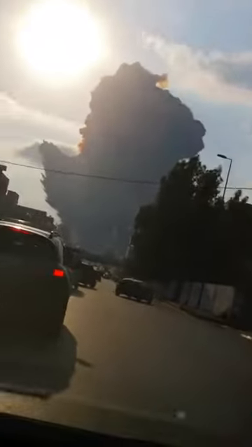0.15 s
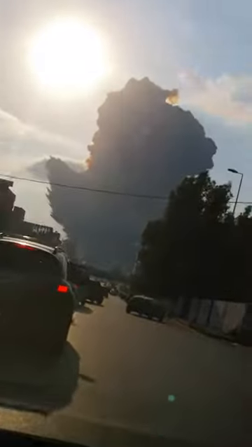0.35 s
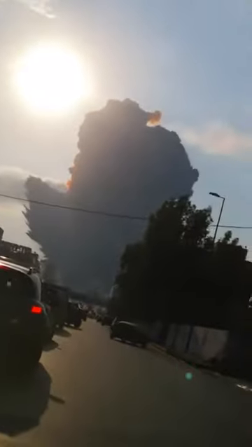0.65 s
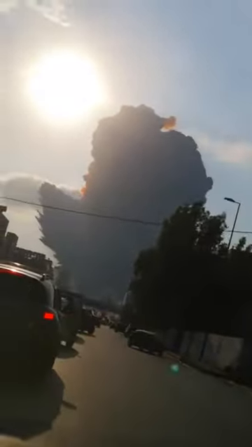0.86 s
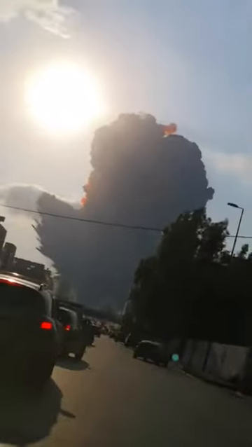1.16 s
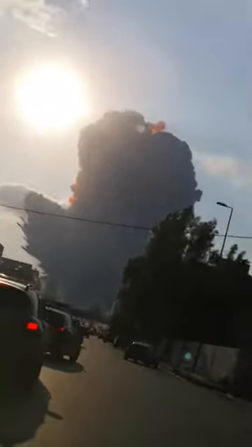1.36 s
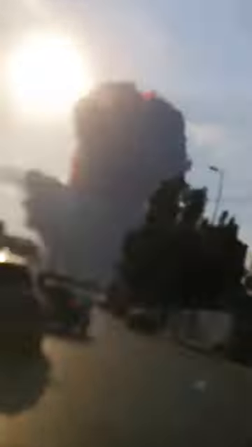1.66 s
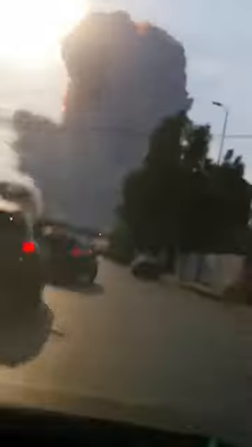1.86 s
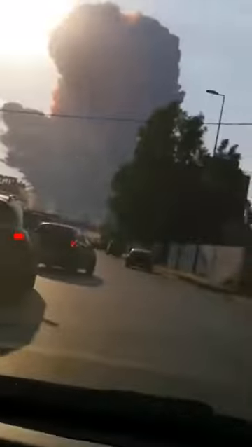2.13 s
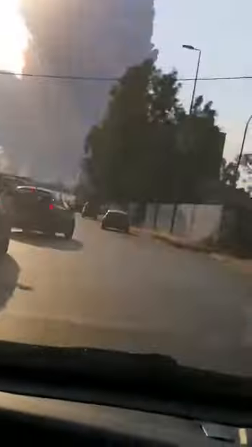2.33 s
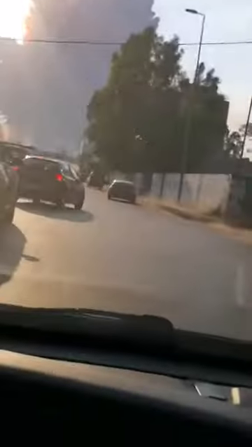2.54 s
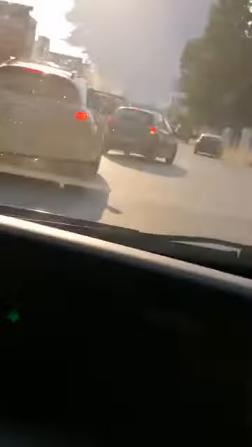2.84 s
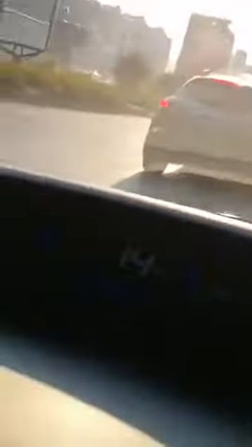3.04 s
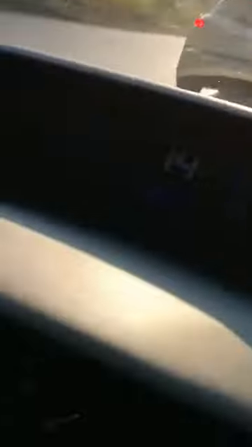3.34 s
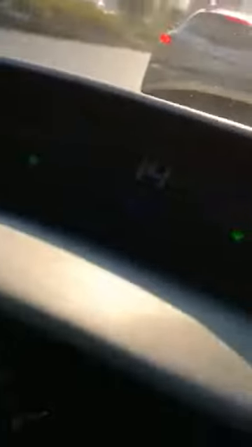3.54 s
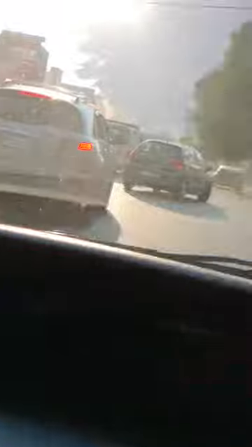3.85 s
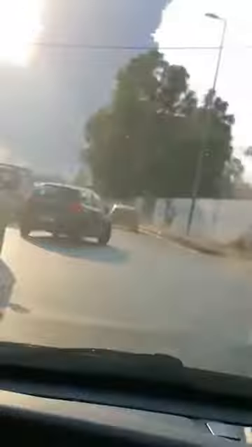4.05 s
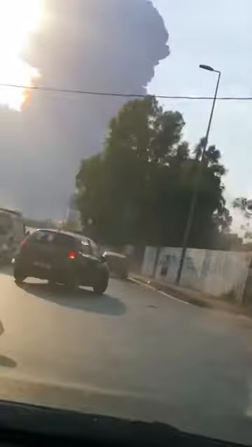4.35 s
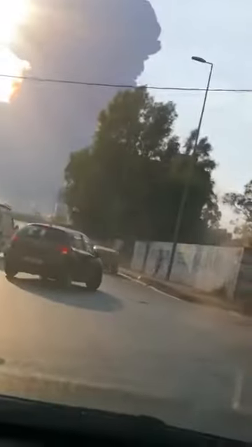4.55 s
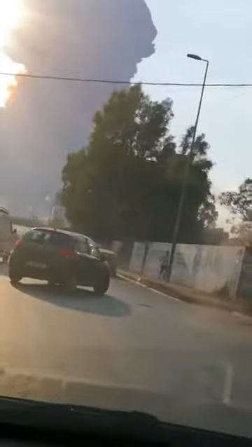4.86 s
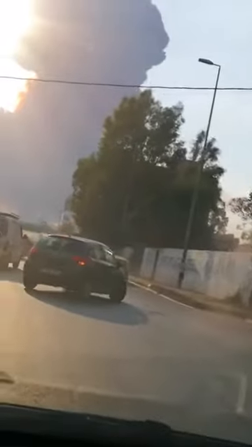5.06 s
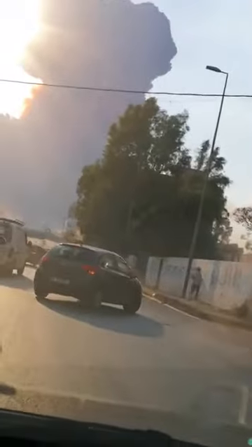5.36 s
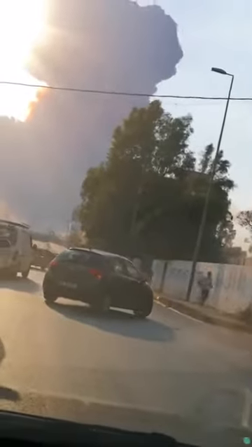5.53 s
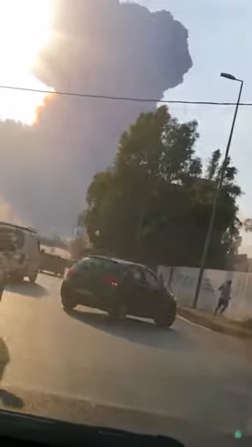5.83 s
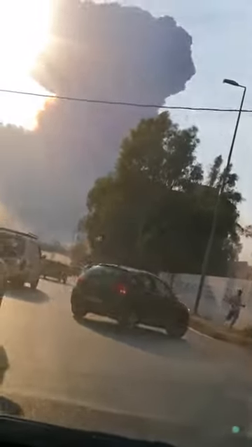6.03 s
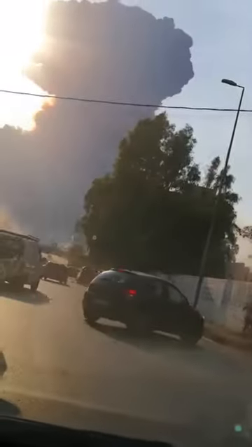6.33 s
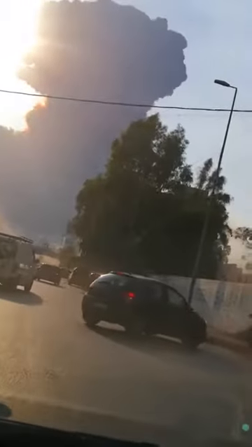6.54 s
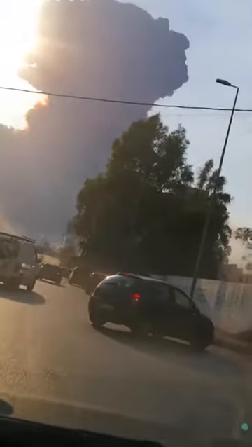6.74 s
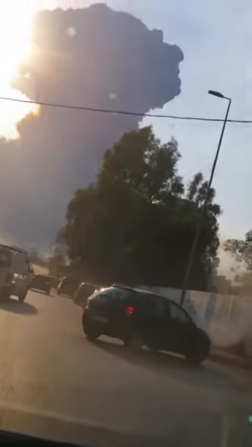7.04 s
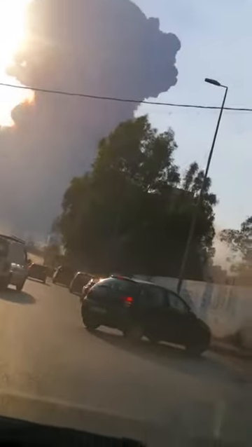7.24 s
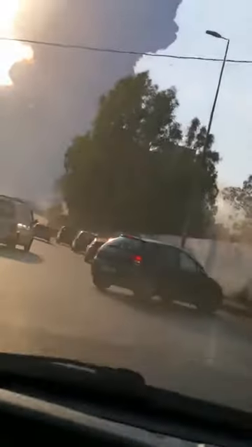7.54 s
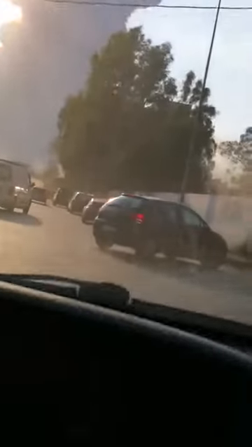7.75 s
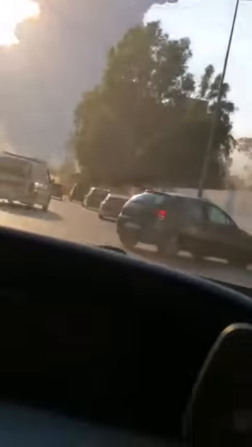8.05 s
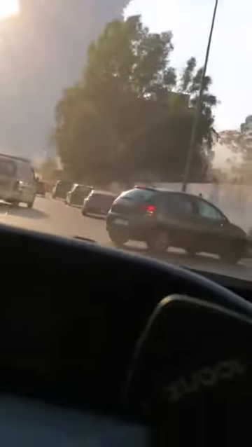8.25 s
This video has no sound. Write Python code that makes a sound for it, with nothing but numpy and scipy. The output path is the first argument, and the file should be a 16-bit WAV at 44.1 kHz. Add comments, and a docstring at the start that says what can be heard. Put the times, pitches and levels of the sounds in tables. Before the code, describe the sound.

Low road noise and gusty wind thumps, a sudden massive explosion, long heavy rumbling echoes, clattering falling fragments, then a distant car alarm as it fades.

```python
"""Distant blast, heard in a car

Inside a slow car with open windows, wind buffets the microphone ports as shaped noise and short low swings.
The shock wave of a huge distant explosion hits: an N-shaped pulse and dying sines make the cabin boom.
Echoes roll in as low noise bands, debris and glass rain down outside as filtered noise and ringing grains,
and a far car alarm warbles: a sine sweeping up and down, smeared by echoes."""
import sys
import numpy as np
from scipy import signal
from scipy.fft import rfft, irfft, next_fast_len
from scipy.io import wavfile
from scipy.ndimage import uniform_filter1d

SR = 44100
rng = np.random.default_rng(int(sys.argv[2]) if len(sys.argv) > 2 else 0)


def int16_out(signal):
    """Quantize to a 16-bit WAV file."""
    q = np.round(np.clip(np.atleast_2d(signal).T, -1, 1) * 32767)
    wavfile.write(sys.argv[1], SR, q.astype(np.int16))


N = 369999   # samples
LEFT_RIGHT = np.array([[1], [-1]])


def from_db(db):
    """Gain of a dB value."""
    return 10 ** (np.asarray(db) / 20)


def rms_one(x):
    """Scaled to rms 1."""
    return x / np.sqrt(np.mean(x ** 2) + 1e-20)


def in_time(rows):
    """Columns as curves; the first one falls silent just outside the table."""
    s, first, *rest = np.transpose(rows)
    t = np.arange(N) / SR
    return [np.interp(t, s, first, -150, -150)] + [np.interp(t, s, column) for column in rest]


def at_hz(points, hz):
    """A frequency table read on a log axis."""
    table_hz, values = np.array(points).T
    return np.interp(np.log(hz), np.log(table_hz), values)


def drift(rate):
    """Slow random wander of spread 1: noise through two equal low-pass poles at the rate in Hz."""
    step = 40   # samples between computed points
    r = np.exp(-2 * np.pi * rate * step / SR)
    noise = rng.standard_normal(N // step + 2002)
    slow = signal.lfilter([1], [1, -2 * r, r * r], noise)[2000:]   # skips the filter's start
    return np.interp(np.arange(N) / step, np.arange(len(slow)), rms_one(slow))


def lumpy(depth_db, rate):
    """Two white noises that swell and sink together."""
    return rng.standard_normal((2, N)) * from_db(depth_db * drift(rate))


# tilt between the ports: (frequency [Hz], left minus right [dB])
PORT_BALANCE = [(60, 0), (310, -.2), (530, 2.5), (900, .5), (1550, -6.5), (2670, -8.5), (4600, -5),
                (7900, -1.5)]


def coloured(pair, spectrum, likeness, lead=((0, 0), (1, 0))):
    """Two unrelated signals filtered to a spectrum and mixed to the likeness, balance and lead of the ports; rms 1."""
    size = next_fast_len(N)
    hz = np.maximum(np.arange(size // 2 + 1) * SR / size, 1)
    inside = (hz >= spectrum[0][0]) & (hz <= spectrum[-1][0])
    mid, side = rfft(pair, size) * from_db(at_hz(spectrum, hz)) * inside
    alike = np.clip(at_hz(likeness, hz), -1, 1)
    ports = np.sqrt(1 + alike) * mid + np.sqrt(1 - alike) * side * LEFT_RIGHT
    ports = ports * np.exp(.5j * np.interp(hz, *np.transpose(lead)) * LEFT_RIGHT)
    balance = from_db(at_hz(PORT_BALANCE, hz) / 2 * LEFT_RIGHT)
    return rms_one(irfft(ports * balance, size)[:, :N])


def evened(x, share):
    """Takes a share of the random swells out of a narrow noise, so that it swings on like a driven resonance."""
    size = next_fast_len(N)
    swell = np.abs(signal.hilbert(x.mean(axis=0), size)[:N])
    return rms_one(x / (swell + 0.25) ** share)


def add(out, s, sound):
    """Mixes a sound in at a time."""
    at = round(s * SR)
    out[..., at:at + sound.shape[-1]] += sound[..., :N - at]


# colour of the street bed: (frequency [Hz], relative density [dB])
STREET_COLOUR = [(410, -35.5), (700, -7.5), (870, -8.5), (955, -5), (1150, -7), (1500, -8.5), (2030, -5.5),
                 (2700, -13.5), (3500, -17.5), (4500, -20.5), (6470, -25), (7960, -22), (8300, -53),
                 (10800, -67.5), (18300, -120)]
# how alike the ports are for the wind and the street bed: (frequency [Hz], left-right correlation [-1 to 1])
WIND_LIKENESS = [(60, 0.94), (120, 0.76), (240, 0.1), (490, -0.56), (980, -0.16), (1960, -0.073),
                 (3940, -0.15), (7910, -0.25)]
STREET_DB = -52.5   # rms


def street():
    """A steady bed of coloured noise that swells gently."""
    return from_db(STREET_DB) * coloured(lumpy(depth_db=.8, rate=6), STREET_COLOUR, WIND_LIKENESS)


# faint steady tones in the cabin: (frequency [Hz], typical rms level [dB])
HUM_TONES = [(937, -68), (1390, -73), (1970, -71)]


def hum():
    """Steady thin tones that waver a little in pitch and level."""
    out = 0
    for hz, level_db in HUM_TONES:
        gain = np.sqrt(2) * from_db(level_db + 2 * drift(3))
        phase = 2 * np.pi * np.cumsum(hz + 3 * drift(8)) / SR
        out = out + gain * np.sin(phase)
    return out


# gusts on the microphone ports, one list per spell of wind: (time [s], level [dB])
GUSTS = [
    [(0.0, -38), (0.06, -14), (0.2, -22), (0.382, -22), (.45, -25), (.54, -31), (0.6, -24), (.67, -19.5),
     (.75, -20), (.78, -20.5), (0.834, -12), (.92, -21), (.97, -32.5), (1.078, -30), (1.346, -31.5),
     (1.53, -33.5)],
    [(8.12, -48), (8.26, -28.5), (8.39, -22)],
]
# colour of the low wind body: (frequency [Hz], relative density [dB])
WIND_COLOUR = [(25, -27), (60, -9.5), (120, 1), (220, -4), (330, -12), (450, -24), (600, -36)]
# colour of the rougher edge on the wind: (frequency [Hz], relative density [dB])
WIND_EDGE_COLOUR = [(250, -46), (350, 1.5), (500, -4), (1000, -27.5), (1800, -59.5)]
# sharp puffs on the ports: (time [s], level [dB], rasp beside the low swing, before a common lift [dB])
PUFFS = [(0.046, -14, -25), (0.059, -21, -21), (0.075, -14, -30), (0.108, -11, -24), (0.174, -5, -31),
         (0.208, -8.5, -17.5), (0.223, -18, -26), (.266, -23, -20.5), (0.35, -19, -34), (0.402, -11, -38),
         (0.445, -27, -18), (0.505, -29, -13), (0.589, -12, -31), (0.648, -4.5, -35), (0.704, -3.5, -27),
         (0.715, -23, -18), (0.746, -15, -36), (0.789, -14, -26), (0.813, -6, -30), (0.838, -10.5, -27),
         (0.859, -16, -27), (0.887, -7, -31), (1.092, -11.5, -38), (1.213, -16, -33), (1.36, -15, -33),
         (1.409, -13, -39), (8.212, -25, -13), (8.275, -18, -15.5), (8.295, -29, -12), (8.319, -19.5, -8.5),
         (8.375, -28, -7)]
WIND_EDGE_DB = -19.5   # edge beside the body
PUFF_T60_S, PUFF_RISE_S, RASP_LIFT_DB = .06, .0025, 6


def wind():
    """Turbulence at each port: lumpy low noise with a rougher edge, and single puffs that swell in a few ms."""
    out = np.zeros((2, N))
    body = coloured(lumpy(depth_db=5.5, rate=72), WIND_COLOUR, WIND_LIKENESS)
    edge = coloured(lumpy(depth_db=3.0, rate=40), WIND_EDGE_COLOUR, WIND_LIKENESS)
    for gust in GUSTS:
        level_db, = in_time(gust)
        out = out + from_db(level_db) * (body + from_db(WIND_EDGE_DB) * edge)
    t = np.arange(SR // 8) / SR
    rasp_band = signal.butter(2, [250, 750], "band", fs=SR, output="sos")
    for s, level_db, rasp_db in PUFFS:
        swing_hz, phases = rng.uniform(69, 207), rng.uniform(0, 1.0, (2, 1))
        push = np.sin(2 * np.pi * swing_hz * t + phases)
        rasp = rms_one(signal.sosfilt(rasp_band, rng.standard_normal((2, len(t)))))
        rasp = rasp * from_db(rasp_db + RASP_LIFT_DB)
        envelope = from_db(level_db - 60 * t / PUFF_T60_S) * np.minimum(t / PUFF_RISE_S, 1)
        add(out, s, envelope * (push + rasp))
    return out * from_db(-.6 * LEFT_RIGHT)   # the right port catches slightly more


# how the far siren comes and goes: (time [s], level [dB])
ALARM = [(4.8, -62), (5.25, -52), (5.5, -58), (6.07, -49), (6.4, -52), (6.7, -46.5), (6.85, -50),
         (7.0, -48), (7.35, -44.5), (7.55, -46), (7.67, -46.5), (7.92, -44), (8.1, -49), (8.39, -55)]
# peaky response of the horn: (frequency [Hz], gain [dB])
HORN = [(1450, -30), (1780, -18), (1900, -3), (2020, -15), (2400, -11), (2620, 4), (2800, -2), (3200, -4),
        (3450, -8)]
# the sweep: a moment at its top, the time for one turn up and down, and its ends
ALARM_TOP_S, ALARM_PERIOD_S, ALARM_TOP_HZ, ALARM_LOW_HZ = 7.238, .1395, 3420, 1450
WALL_ECHO_S, WALL_ECHO_DB = .068, -11   # one strong echo of the siren
NEAR_ECHO_T60_S, NEAR_ECHO_DB = .06, -1   # cars close by scatter the siren
STREET_ECHO_T60_S, STREET_ECHO_DB = .6, 1


def alarm():
    """A siren sweeps in a triangle through a peaky horn; near and far echoes smear the sweep."""
    turns = (np.arange(N) / SR - ALARM_TOP_S) / ALARM_PERIOD_S
    from_top = 2 * np.abs(turns - np.round(turns))   # 0 at the top of the sweep, 1 at the bottom
    hz = ALARM_TOP_HZ - (ALARM_TOP_HZ - ALARM_LOW_HZ) * from_top
    level_db = in_time(ALARM)[0] + at_hz(HORN, hz) + .7 * drift(5) + 3 * drift(80)
    siren = from_db(level_db) * np.sin(2 * np.pi * np.cumsum(hz) / SR)
    late = round(WALL_ECHO_S * SR)
    delayed = np.r_[np.zeros(late), siren[:-late]]
    siren = siren + from_db(WALL_ECHO_DB + 3 * drift(2)) * delayed
    t, paths = np.arange(SR) / SR, 0
    for t60, echo_db in ((NEAR_ECHO_T60_S, NEAR_ECHO_DB), (STREET_ECHO_T60_S, STREET_ECHO_DB)):
        sparse = rng.standard_normal((2, SR)) * (rng.random((2, SR)) < .05)
        echoes = sparse * from_db(-60 * t / t60)
        paths = paths + from_db(echo_db) * echoes / np.sqrt(np.sum(echoes ** 2, axis=1, keepdims=True))
    return siren + signal.fftconvolve(siren[None], paths, axes=1)[:, :N]


# thin squeals, perhaps brakes: (time of the peak [s], frequency there [Hz], glide [Hz/s],
# rms level at the peak [dB], rise [dB/s], fall [dB/s])
SQUEALS = [(7.96, 2255, -1500, -36.5, 280, 230), (.95, 7760, -200, -58, 350, 200)]


def squeals():
    """Short gliding sines that swell and fade around a peak."""
    out = 0
    for s, hz, glide, peak_db, rise, fall in SQUEALS:
        t = np.arange(N) / SR - s
        level_db = peak_db + np.where(t < 0, rise * t, -fall * t)
        phase = 2 * np.pi * (hz * t + glide * t ** 2 / 2)
        out = out + np.sqrt(2) * from_db(level_db) * np.sin(phase)
    return out


# surges that shake the panels: (time [s], clatter [dB], dull rattle [dB], glassy top [dB], hold [s])
SURGES = [(1.533, -23, -27, -32, 0.0074), (1.55, -26, -19, -57, 0.032), (1.595, -36, -29, -64, 0.017),
          (1.683, -37, -35, -52, .01), (1.727, -33.5, -30, -61, 0.0075), (1.765, -37, -24, -73, 0.023),
          (1.8, -42, -33, -64, 0.018), (1.91, -61, -43, -68, 0.013), (2.06, -57, -60, -70, 0.0061),
          (2.18, -65, -52, -69, 0.01), (2.45, -49, -51, -52, 0.1)]
# density of the falling debris: (time [s], clatter level [dB], glass beside the clatter [dB])
SHOWER = [(3.1, -58, 2.5), (3.33, -44, -1), (3.39, -30.5, -14), (3.5, -27, -8), (3.65, -26, -8),
          (3.84, -27, -8.5), (3.9, -29.5, -5), (4.05, -26.5, -8), (4.27, -34, -7.5), (4.7, -35, -5),
          (5.43, -38.5, -7.5), (5.47, -46.5, 3), (5.56, -43, -17), (5.6, -38, -7), (5.9, -40, -6.5),
          (6.2, -40.5, -12), (6.76, -44, -11.5), (7.06, -49.5, -19), (7.84, -49, -21), (8.39, -53, -8)]
# starting level of the panel buzz: clatter [dB], rattle [dB], top [dB]
BUZZ_DB = (-39, -38.5, -45)
BUZZ_FADE_DB_PER_S, BUZZ_PATCHY_DB = 3, 1   # panels buzz on while the echoes roll
SURGE_RISE_S, SURGE_T60_S = 0.0019, 0.098
SHOWER_RATTLE_DB = -11.5   # beside the clatter


def debris_levels():
    """Clatter, rattle and top: surges on the panels, their patchy fading buzz and the shower of debris add up."""
    t = np.arange(N) / SR
    shower_db, glass_db = in_time(SHOWER)
    gains = from_db([shower_db, shower_db + SHOWER_RATTLE_DB, shower_db + glass_db])
    fade_db = BUZZ_FADE_DB_PER_S * (t - SHOCK[0])
    gains = gains + from_db(np.c_[list(BUZZ_DB)] - fade_db + BUZZ_PATCHY_DB * drift(16))
    for k, (s, *levels_db, hold_s) in enumerate(SURGES):
        rise = np.clip((t - s) / SURGE_RISE_S + (k == 0), 0, 1)   # the first one comes at once with the shock
        dying_s = np.maximum(t - s - SURGE_RISE_S - hold_s, 0)
        gains = gains + rise * from_db(np.c_[levels_db] - 60 * dying_s / SURGE_T60_S)
    return (t > SHOCK[0]) * gains


# colour of the clatter: (frequency [Hz], relative density [dB])
CLATTER_COLOUR = [(1000, -17), (1350, -5), (1800, 0.5), (2100, 2), (2400, 1), (2750, -0.5), (3300, -7.5),
                  (3900, -14), (4600, -42.5)]
# colour of the dull rattle: (frequency [Hz], relative density [dB])
RATTLE_COLOUR = [(600, -7), (780, 0), (870, -1.5), (1050, -4.5), (1320, -7), (1500, -17), (1800, -15.5)]
# colour of the glassy top: (frequency [Hz], relative density [dB])
GLASS_COLOUR = [(3300, -8), (4200, -4), (5500, -6), (6400, -10), (7200, -3), (8200, -16.5), (11000, -12),
                (15500, -25.5)]
# how alike the ports are for the debris and the echoes: (frequency [Hz], left-right correlation [-1 to 1])
FAR_LIKENESS = [(60, 1), (125, 1), (250, 0.99), (500, 0.46), (1000, 0.45), (2000, 0.053), (4000, 0.054),
                (8000, 0.049)]
# how far the left port leads for the debris and the echoes: (frequency [Hz], phase [radians])
FAR_LEAD = [(0, 0), (40, -.04), (85, -.2), (170, -.55), (260, -0.7), (520, 2.5), (860, 1.5), (1290, -0.2),
            (1640, -0.3), (1980, -1), (2500, -6), (3010, -7.5), (3360, -10), (4310, 0.5), (6200, 1.5),
            (6550, 1.5), (8100, 1)]


def debris(per_s=1500, spread_db=3, grain_db=-5, cycles=90):
    """A dense smooth rush of falling pieces, with nearer pieces ringing briefly at pitches of their own."""
    struck = rng.random((2, N)) < per_s / SR
    sizes = from_db(spread_db * np.minimum(rng.exponential(1, (2, N)), 4)) * struck
    pitches, dealt, grains = np.geomspace(800, 8000, 36), rng.integers(0, 36, N), 0
    for k, hz in enumerate(pitches):
        r = from_db(-60 * hz / (cycles * SR))   # each grain falls 60 dB in this many cycles
        w = 2 * np.pi * hz / SR
        strikes = sizes * (dealt == k) + 1e-18
        ringing = signal.lfilter([0, np.sin(w)], [1, -2 * r * np.cos(w), r * r], strikes)
        grains = grains + hz * ringing   # higher pitches ring stronger
    shower = rms_one(lumpy(depth_db=0.84, rate=21)) + from_db(grain_db) * rms_one(grains)
    clatter_gain, rattle_gain, glass_gain = debris_levels()
    clatter = clatter_gain * coloured(shower, CLATTER_COLOUR, FAR_LIKENESS, FAR_LEAD)
    rattle = rattle_gain * coloured(shower, RATTLE_COLOUR, FAR_LIKENESS, FAR_LEAD)
    glass = glass_gain * coloured(shower, GLASS_COLOUR, FAR_LIKENESS, FAR_LEAD)
    return clatter + rattle + glass


SNAP_DB, SNAP_T60_S = 6, .008   # first contact of a hit, above its burst


def hits(table, t60, burst_db, low_hz, top_hz, rough, rise_s):
    """Each hit: a short rough ring on its pitch over a snap and a burst of noise, mostly shared by the ports."""
    out, t = np.zeros((2, N)), np.arange(SR // 5) / SR
    burst_band = signal.butter(3, [low_hz, top_hz], "band", fs=SR, output="sos")
    decay = from_db(-60 * t / t60) * np.minimum(t / rise_s, 1)
    snap = 1 + from_db(SNAP_DB - 60 * t / SNAP_T60_S)
    for s, level_db, hz, pan_db in table:
        noise = rng.standard_normal((2, 2, len(t)))   # (ring or burst, port, sample)
        noise = .75 * noise + .45 * noise.sum(axis=1, keepdims=True)
        band = signal.butter(1, [hz / (1 + rough), hz * (1 + rough)], "band", fs=SR, output="sos")
        tone = rms_one(signal.sosfilt(band, noise[0]))
        burst = from_db(burst_db) * snap * signal.sosfilt(burst_band, noise[1])
        add(out, s, (tone + burst) * decay * from_db(level_db + pan_db / 2 * LEFT_RIGHT))
    return out


# ticks of trim, grit and glass: (time [s], ring level before its decay [dB], pitch [Hz], left minus right [dB])
TICKS = [(0.631, -49, 3770, -6), (0.713, -36, 7800, -7), (0.7885, -33.5, 5760, -2), (0.8606, -36, 7700, -6),
         (1.1478, -42.5, 5930, -3), (1.507, -34, 5200, -11), (1.537, -22.5, 3520, 14),
         (1.683, -33, 3840, 11), (1.803, -41, 3900, 5), (1.935, -39, 3900, 9), (2.456, -38, 4930, 9),
         (2.748, -48, 7240, 2), (2.913, -44, 7260, 12), (3.1005, -36, 3680, 2), (3.2742, -20, 4000, 5.5),
         (4.3936, -28, 4560, 1), (5.0499, -36, 7210, 2), (6.3994, -45, 5540, 3), (7.0684, -40, 6000, -2),
         (7.429, -47, 6100, -1), (7.7897, -38, 5130, -2), (8.1509, -52, 5500, 7), (8.203, -43, 6560, -3),
         (8.185, -43.5, 5950, 7), (8.2194, -50, 6000, -3)]


def ticks():
    """Small hard pieces: bright, quick hits with a narrow ring."""
    return hits(TICKS, t60=.044, burst_db=-9, low_hz=2500, top_hz=9500, rough=.035, rise_s=.0003)


# larger pieces landing: (time [s], ring level before its decay [dB], pitch [Hz], left minus right [dB])
CLACKS = [(.631, -49.5, 2000, 8), (1.557, -19, 1450, -9), (1.572, -25, 1520, 6), (1.545, -20, 2300, 0),
          (1.565, -32, 2500, -1.5), (1.583, -30, 1700, 3), (1.604, -31, 1300, 7), (1.7261, -31, 1820, 7),
          (1.77, -39, 1520, 6), (1.784, -38, 1900, 13), (2.187, -44, 800, 7), (2.4543, -35.5, 1530, 8),
          (2.52, -35, 950, 6), (2.6842, -30, 960, 6), (2.7474, -30.5, 950, 2), (2.754, -33, 2680, -2),
          (2.697, -40, 2760, 0), (2.917, -33, 2680, -9), (2.48, -35, 2700, 4), (2.9115, -27, 900, 5),
          (2.96, -36.5, 1330, 8), (3.2742, -25.5, 2670, -1), (3.371, -27.5, 1220, -6),
          (3.487, -20.5, 1580, -4), (3.489, -27.5, 2920, -10), (3.527, -32, 2500, 0),
          (3.632, -26, 1340, -8), (3.762, -34, 1390, -2), (3.795, -28.5, 2680, -9), (3.56, -34, 2800, -2),
          (3.71, -28, 2900, -6), (3.5183, -22.5, 1290, -6), (3.6092, -22.5, 1800, 1),
          (3.6277, -28, 2520, -7), (3.7539, -21, 2260, -7), (3.675, -26, 2500, -5), (3.8194, -26, 2000, -8),
          (3.945, -29, 3300, -6), (4.049, -36, 1770, -13), (4.2293, -24.5, 2820, -5),
          (4.5121, -31, 2130, -4), (4.9294, -32, 1260, -3), (5.7697, -41, 1660, -8),
          (6.069, -37, 2546, -10), (7.492, -42, 1600, -5)]


def clacks():
    """Larger pieces land: lower, rougher and longer hits with a strong burst."""
    return hits(CLACKS, t60=.1, burst_db=4, low_hz=500, top_hz=3300, rough=.12, rise_s=.002)


# ringing glass or sheet: (time [s], ring level before its decay [dB], pitch [Hz], left minus right [dB])
PINGS = [(5.235, -36, 2680, -6), (5.24, -36, 2150, -6), (5.395, -38, 2060, -6), (5.585, -31, 2270, -6),
         (5.76, -35, 1630, -5), (6.06, -34, 2650, -6)]


def pings():
    """Pieces of glass or sheet ring on one pitch: a very narrow band and a faint burst."""
    return hits(PINGS, t60=.25, burst_db=-15, low_hz=1200, top_hz=4500, rough=.008, rise_s=.001)


# rolling echoes of the blast: (time [s], cabin boom [dB], rumble [dB], roar [dB])
ROLL = [(1.53, -26, -22, -20), (1.58, -18, -14, -21), (1.62, -14.5, -18, -29), (1.72, -12, -14, -24),
        (1.8, -10, -10, -20), (1.95, -7, -18, -30), (2.14, -8, -17, -29), (2.36, -10, -15, -29),
        (2.47, -12, -11, -22), (2.58, -8, -15, -28), (2.68, -7, -17, -25), (2.81, -17, -15, -27),
        (2.9, -9, -11, -27), (3.15, -14, -19, -29), (3.39, -8, -15, -27), (3.84, -13, -19, -31),
        (4.15, -10, -15, -32), (4.49, -19, -22, -35.5), (5.4, -20, -23, -38), (6.3, -18, -26, -41),
        (6.5, -25, -25, -41), (6.74, -16, -26, -43), (6.85, -24, -27, -42), (7.3, -22, -27.5, -44),
        (8.39, -23, -31, -47)]
# road boom before the blast: (time [s], level [dB])
ROAD_BOOM = [(0.0, -25.5), (0.46, -25), (0.55, -33), (1.0, -28), (1.53, -27)]
# colour of the cabin boom: (frequency [Hz], relative density [dB])
BOOM_COLOUR = [(5, -12), (14, -12), (24, -19), (32, -14), (38, -2), (44, -0.5), (54, -8), (75, -9),
               (95, -38)]
# colour of the rumble: (frequency [Hz], relative density [dB])
RUMBLE_COLOUR = [(60, -25.5), (80, 0.5), (100, -0.5), (130, 0.5), (180, -3.5), (250, -11), (320, -24)]
# colour of the roar: (frequency [Hz], relative density [dB])
ROAR_COLOUR = [(210, -21.5), (270, -2.5), (400, -3), (550, -11), (750, -16), (1000, -21.5)]


def roll():
    """Echoes from the whole city arrive as thick low noise; road boom fills the same cabin mode before."""
    boom_db, rumble_db, roar_db = in_time(ROLL)
    t = np.arange(N) / SR
    arrived = t > SHOCK[0]
    boom = coloured(lumpy(depth_db=1.5, rate=6), BOOM_COLOUR, FAR_LIKENESS, FAR_LEAD)
    boom = evened(boom, share=.35)
    rumble = coloured(lumpy(depth_db=1.5, rate=33), RUMBLE_COLOUR, FAR_LIKENESS, FAR_LEAD)
    rumble = evened(rumble, share=0.084)
    roar = coloured(lumpy(depth_db=2.2, rate=15.0), ROAR_COLOUR, FAR_LIKENESS, FAR_LEAD)
    boom_gain = arrived * from_db(boom_db) + from_db(in_time(ROAD_BOOM)[0])
    for s, _, hold_s in THUMPS:   # a thump restarts the swing of the cabin; the boom builds up again
        rebuilt = 1 - from_db(-30 * np.clip(t - s - hold_s, 0, 2) / THUMP_T60_S)
        boom_gain = boom_gain * np.where(t > s - .01, rebuilt, 1)
    boom_gain = uniform_filter1d(boom_gain, size=400)
    return boom_gain * boom + arrived * (from_db(rumble_db) * rumble + from_db(roar_db) * roar)


def ring(length, hz, t60):
    """A dying sine."""
    t = np.arange(length) / SR
    return np.sin(2 * np.pi * hz * t) * from_db(-60 * t / t60)


# shock front: time [s], peak before it is dulled [dB], length [s]
SHOCK = (1.5325, -0.66, 0.004)
# cabin resonances set off by the shock: (frequency [Hz], starting level [dB], t60 [s])
CABIN_MODES = [(145, -1, .4), (240, -2, .07), (420, -10, .05), (850, -18, .05)]
# late single echoes that kick the cabin boom: (time [s], level [dB], hold [s])
THUMPS = [(4.1, -1.5, 0.014), (4.359, -5, 0.037), (5.431, 1, 0.033), (5.865, -9.5, 0.024),
          (6.883, -7.5, 0.078), (7.405, -11.5, 0.035)]
THUMP_HZ, THUMP_T60_S, THUMP_RISE_S = 48, .22, .008


def blast():
    """An N-shaped pressure front, dulled by the glass, strikes the cabin modes; late echoes kick the boom again."""
    out = np.zeros(N)
    shock_s, peak_db, length_s = SHOCK
    add(out, shock_s, from_db(peak_db) * np.linspace(1, -1, round(length_s * SR)))
    out = signal.sosfilt(signal.butter(2, 3000, fs=SR, output="sos"), out + 1e-18)
    for hz, level_db, t60 in CABIN_MODES:
        add(out, shock_s, from_db(level_db) * ring(SR, hz, t60))
    t = np.arange(SR) / SR
    for s, level_db, hold_s in THUMPS:
        swing = np.sin(2 * np.pi * THUMP_HZ * t) * np.minimum(t / THUMP_RISE_S, 1)
        add(out, s, swing * from_db(level_db - 60 * np.maximum(t - hold_s, 0) / THUMP_T60_S))
    return out


def scene():
    """All sources at the two ports, from the background to the blast."""
    background = street() + hum() + wind() + alarm() + squeals()
    pieces = debris() + ticks() + clacks() + pings()
    return background + pieces + roll() + blast()


AGC_KNEE_DB, AGC_SHARE = -2.5, 0.57   # the share of the excess over the knee that is taken off
AGC_RELEASE_DB_PER_S, AGC_ATTACK_S = 49.5, 0.012


def gain_control(x):
    """Peaks above the knee pull the gain down; it recovers at a steady pace."""
    ramp = AGC_RELEASE_DB_PER_S * np.arange(N) / SR
    peak_db = 20 * np.log10(np.abs(x).max(axis=0) + 1e-9)
    held_db = np.maximum.accumulate(peak_db + ramp) - ramp   # peaks held, sinking at the release pace
    cut_db = -AGC_SHARE * np.maximum(held_db - AGC_KNEE_DB, 0)
    r = np.exp(-1 / (AGC_ATTACK_S * SR))
    return x * from_db(signal.lfilter([1 - r], [1, -r], cut_db))


MIC_EDGE_HZ, MIC_TOP_HZ, CUTOFF_HZ = 8250, 10200, 15700
MIC_TOP_DB, MIC_HISS_DB = -16, -75   # hiss before the final cut


def record(dry):
    """The gain ducks, peaks are rounded; treble falls away at an edge, returns faintly above and is cut."""
    dry = gain_control(dry)
    rounded = dry / (1 + np.abs(dry) ** 8) ** .125
    main = signal.sosfilt(signal.ellip(8, 1, 45, MIC_EDGE_HZ, fs=SR, output="sos"), rounded)
    top = signal.sosfilt(signal.cheby2(8, 20, MIC_TOP_HZ, "high", fs=SR, output="sos"), rounded)
    hiss = from_db(MIC_HISS_DB) * rng.standard_normal(dry.shape)
    final_cut = signal.cheby2(12, 70, CUTOFF_HZ, fs=SR, output="sos")
    return signal.sosfilt(final_cut, main + from_db(MIC_TOP_DB) * top + hiss)


dry = scene()
out = record(dry)
int16_out(out)
```